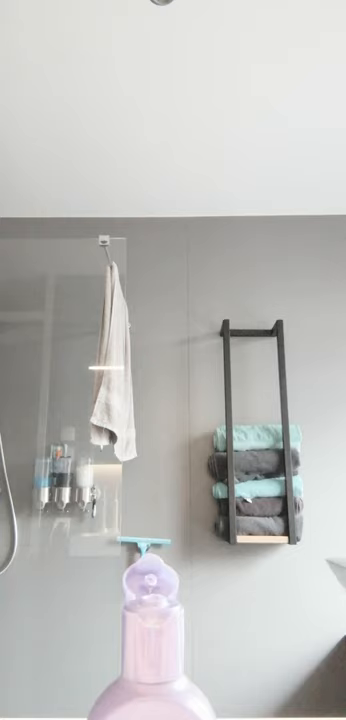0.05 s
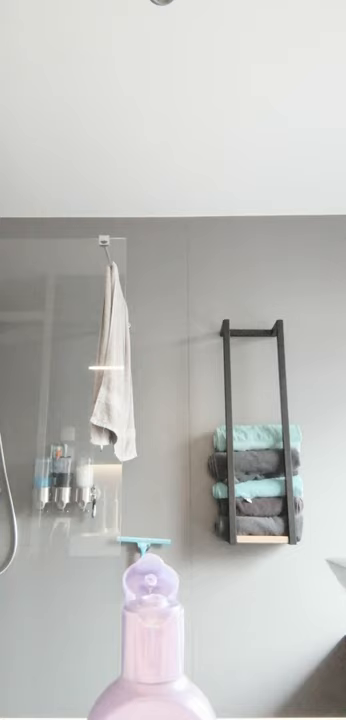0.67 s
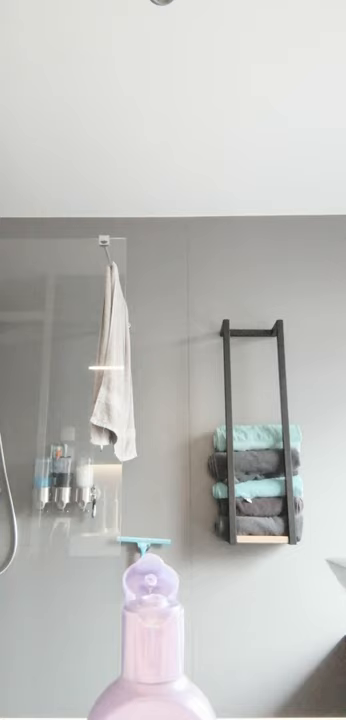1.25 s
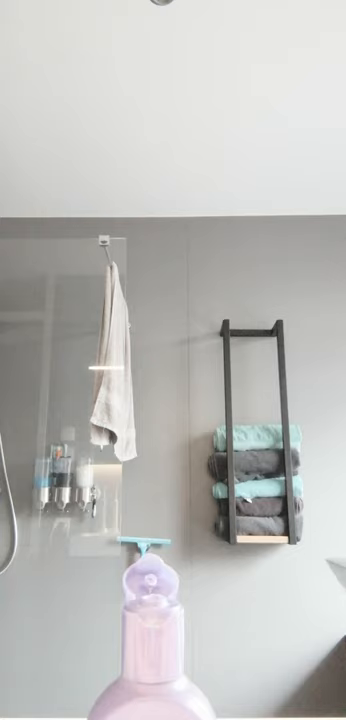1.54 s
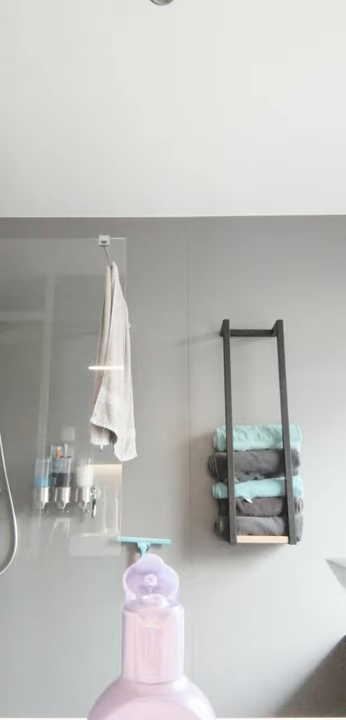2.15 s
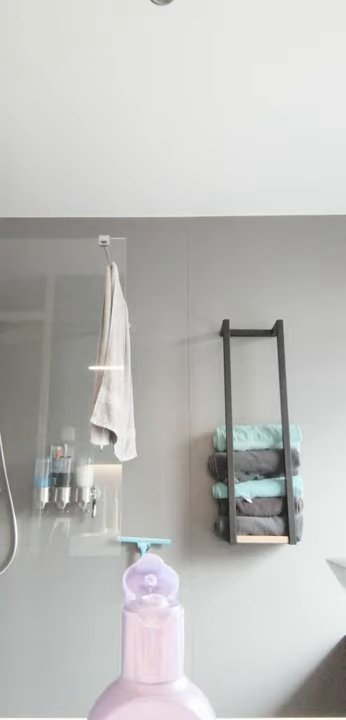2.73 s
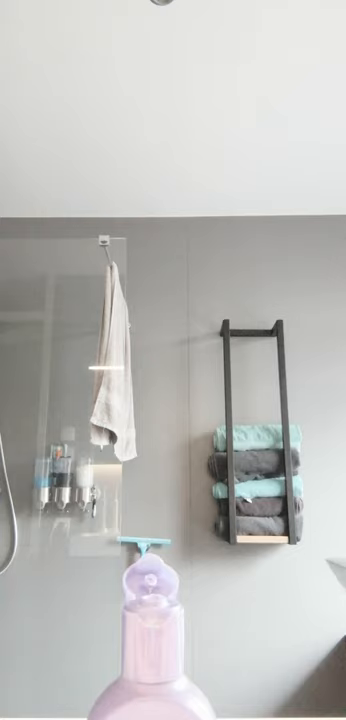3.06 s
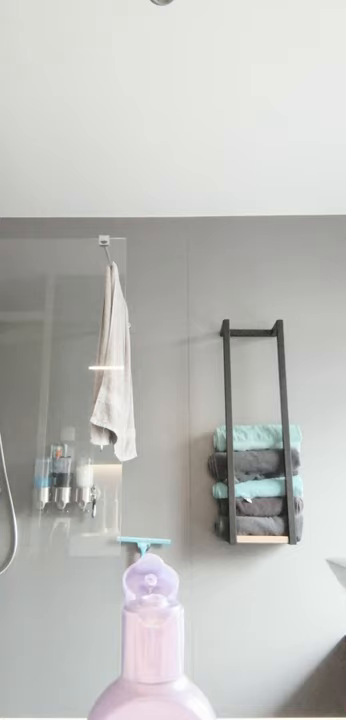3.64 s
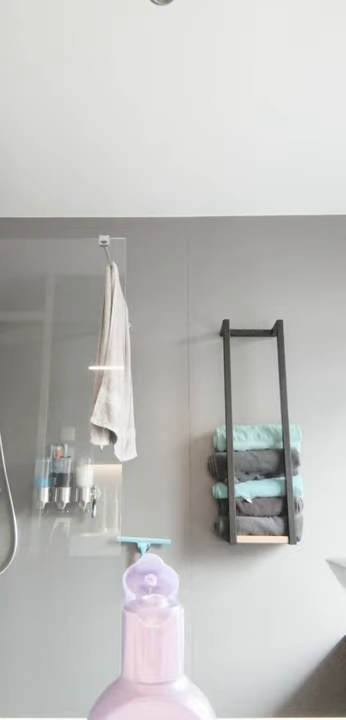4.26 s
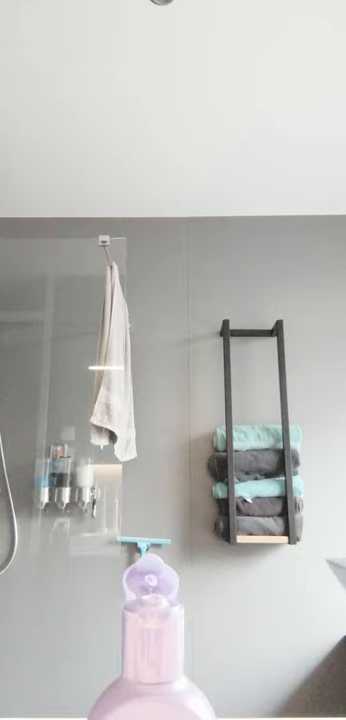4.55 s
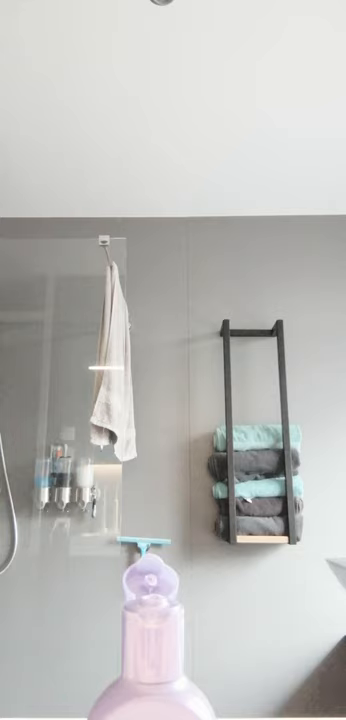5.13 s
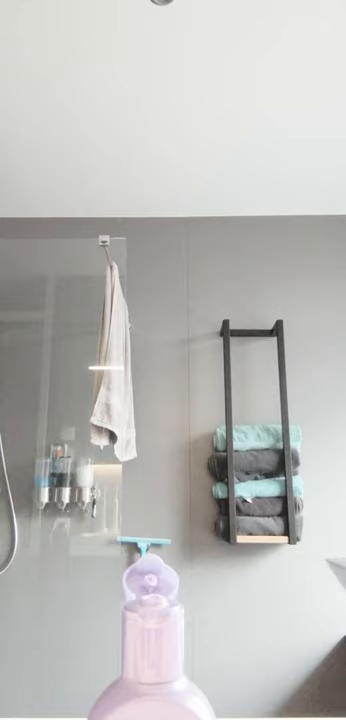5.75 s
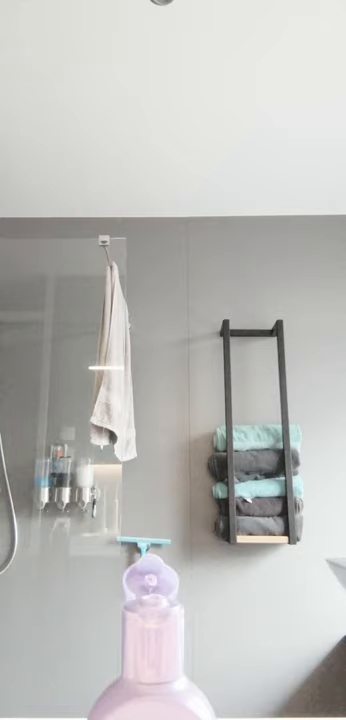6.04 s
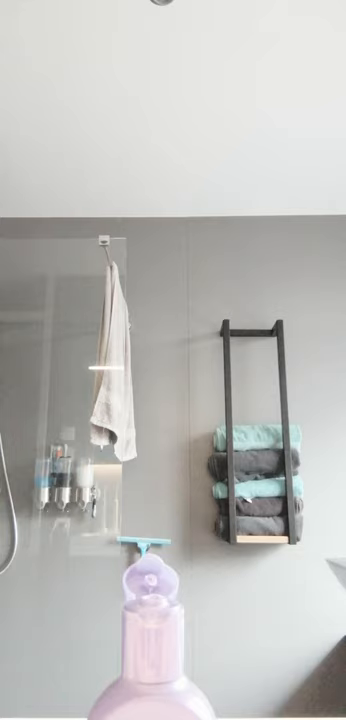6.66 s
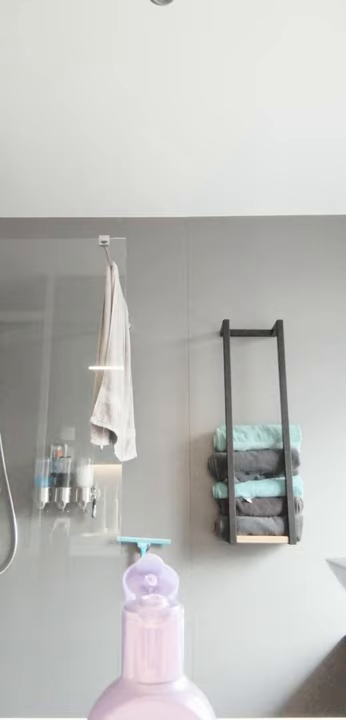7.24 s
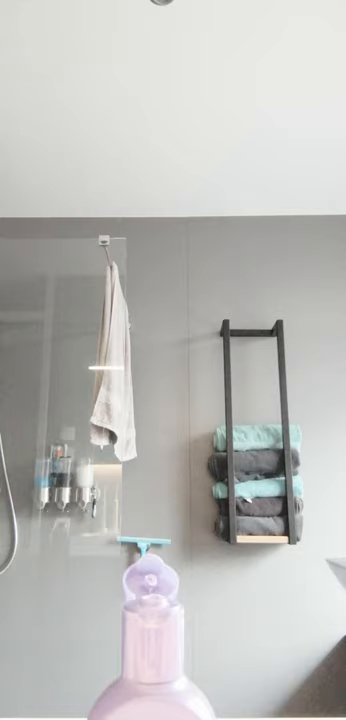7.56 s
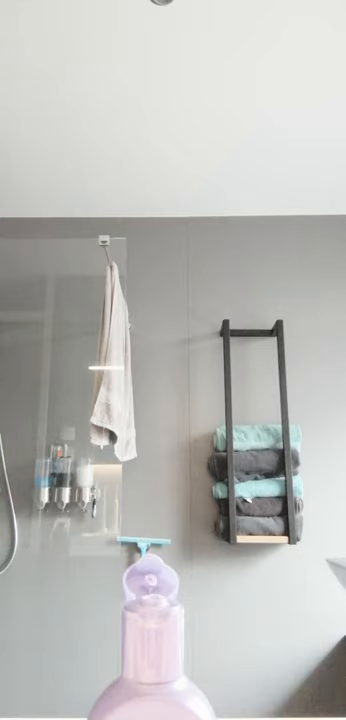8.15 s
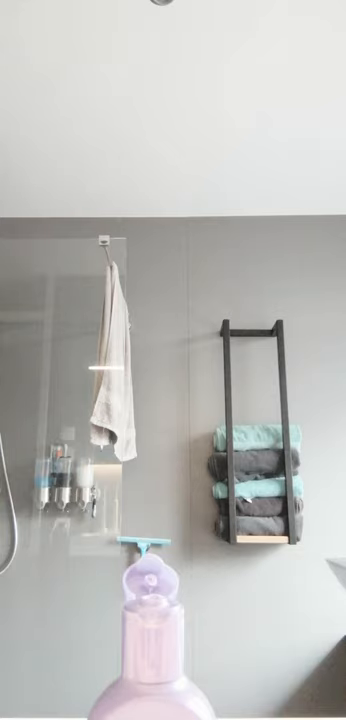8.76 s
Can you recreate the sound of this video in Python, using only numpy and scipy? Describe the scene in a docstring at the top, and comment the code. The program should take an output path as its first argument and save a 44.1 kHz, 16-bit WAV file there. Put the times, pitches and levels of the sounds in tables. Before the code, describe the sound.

Water sprays into a filling bathtub, hissing and gurgling, dropping to a dribble and surging back in an echoing bathroom.

```python
"""A tiled bathroom: water sprays into a filling tub; the jet swells, drops to a dribble and comes back.
Drop impacts on the pool add up to patter and hiss, and the jet drives the tub's shell into drumming.
Air forced under the surface resonates as bubbles: clouds of them gurgle, small clusters plink.
Single drops tick on the wall, two hard splashes stand out, and the tiles reverberate."""
import sys
import numpy as np
from scipy import signal
from scipy.fft import rfft, irfft, next_fast_len
from scipy.io import wavfile

SR = 44100
rng = np.random.default_rng(int(sys.argv[2]) if len(sys.argv) > 2 else 0)


def persist_wave(psi):
    """Save psi, clipped to +-1, as 16-bit WAV."""
    counts = np.round(np.clip(psi, -1, 1) * 32767).astype(np.int16)
    wavfile.write(sys.argv[1], SR, np.atleast_2d(counts).T)


N = 388080

# how hard the jet hits the pool: time_s, flow_db
JET_FLOW = [(0, -40.5), (.15, -37), (.44, -35.5), (.6, -41), (.76, -51), (1.25, -58.5), (1.49, -43),
            (1.67, -31.5), (2.05, -49), (2.3, -50), (2.42, -36), (3.3, -31.5), (4.05, -35), (5.2, -34),
            (5.38, -47), (5.62, -59), (6.08, -55.5), (6.3, -65), (6.72, -59.5), (6.96, -52), (7.2, -32),
            (8.05, -38.5), (8.8, -42)]
FULL_FLOW_DB = -34
# the spray's hiss and patter as heard, including the microphone's colour: frequency_hz, gain_db
HEARD_SPECTRUM = [(1300, -10), (2000, -8), (3200, -7.5), (3700, -13.5), (4200, -13), (5300, 1), (5900, 0.5),
                  (6600, -3.5), (7250, 0), (8700, -11), (11500, -12.5), (13800, -11.5), (14900, -5.5),
                  (15700, -31)]


def amp(db):
    """Decibels to amplitude ratio."""
    return 10 ** (np.asarray(db) / 20)


def unit(x):
    """Scale to rms 1."""
    return x / np.sqrt(np.mean(x ** 2) + 1e-20)


def peaking(x, db):
    """Scale to a peak level."""
    return amp(db) * x / np.abs(x).max()


def along(points, hz):
    """Interpolate (frequency, value) points on a logarithmic axis."""
    f, v = np.transpose(points)
    return np.interp(np.log(hz + 1), np.log(f + 1), v)


def curve(points):
    """Interpolate (time, value) points at every sample."""
    return np.interp(np.arange(N) / SR, *np.transpose(points))


def filtered(x, response):
    """Linear filtering: the spectrum times a frequency response."""
    n = x.shape[-1]
    m = next_fast_len(n + SR // 4)
    return irfft(rfft(x, m) * response(np.fft.rfftfreq(m, 1 / SR)), m)[..., :n]


def band(hz, lo_hz, hi_hz, order=8):
    """Butterworth band-pass magnitude."""
    return 1 / np.sqrt((1 + (lo_hz / (hz + 1)) ** (2 * order)) * (1 + (hz / hi_hz) ** (2 * order)))


def resonances(modes, hz):
    """Modal superposition: damped resonators summed with alternating sign."""
    return sum((-1) ** k * amp(db) * 1j * hz * width / (centre ** 2 - hz ** 2 + 1j * hz * width)
               for k, (centre, width, db) in enumerate(modes))


def add(track, start_s, sound):
    """Superpose a sound on a track."""
    part = track[..., max(round(start_s * SR), 0):][..., :sound.shape[-1]]
    part += sound[..., :part.shape[-1]]


def swell(t, length_s, attack_s, fade_db_per_s):
    """Linear rise, hold until length_s, exponential decay."""
    return np.clip(t / attack_s, 0, 1) * amp(-fade_db_per_s * np.maximum(t - length_s, 0))


def flow_gain(level_db, growth):
    """Power law: a layer gains growth dB for each dB of flow."""
    return amp(level_db + growth * (curve(JET_FLOW) - FULL_FLOW_DB))


def bathroom(x, direct_db, spacing_m=0.17, left_lead_s=.0003):
    """Reverberation: the direct sound plus a diffuse field, partly coherent between left and right."""
    # decay of the tiled room: frequency_hz, t60_s
    decay_times = [(150, 0.77), (1000, 0.38), (3000, 0.67), (6000, 0.54), (14000, 0.15)]
    hz, t, tail = signal.stft(rng.standard_normal((2, SR // 2)), SR, nperseg=256)
    tail = tail * amp(-60 * t / along(decay_times, hz)[:, None])
    coherence = np.sinc(2 * hz * spacing_m / 343)
    angle = np.arccos(coherence)[:, None] / 2
    mid, side = np.cos(angle) * tail[0], np.sin(angle) * tail[1]
    response = signal.istft(np.array([mid + side, mid - side]), SR, nperseg=256)[1]
    response /= np.linalg.norm(response[0])
    response[[0, 1], [0, round(left_lead_s * SR)]] += amp(direct_db)
    return signal.fftconvolve(x[None], response, axes=1)


def wandering(x, direct_db, block=16000):
    """A room's response depends on source position: as the impact point wanders, each block gets its own."""
    out = np.zeros((2, len(x)))
    for start in range(0, len(x), block):
        add(out, start / SR, bathroom(x[start:start + block], direct_db))
    return out


def impacts(per_s, spread_db, direct_db):
    """Shot noise in the room: drops strike at random times, many small, a few large."""
    count = int(per_s * N / SR)
    size = amp(spread_db * np.minimum(rng.exponential(size=count), 5))
    pulses = np.bincount(rng.integers(0, N, count), size * rng.choice([-1, 1], count), N)
    return wandering(pulses, direct_db)


def stream(colour, per_s, spread_db, direct_db):
    """Source and filter: random impacts shaped by a frequency response."""
    return unit(filtered(impacts(per_s, spread_db, direct_db), colour))


def shower(colour, per_s, spread_db, direct_db, wash_db=0):
    """Countless tiny impacts merge into Gaussian noise beneath the distinct ones."""
    hits = unit(impacts(per_s, spread_db, direct_db))
    return unit(filtered(hits + amp(wash_db) * rng.standard_normal((2, N)), colour))


def heard_band(lo_hz, hi_hz, order=8):
    """Frequency response for one band of the spray's spectrum as heard."""
    return lambda hz: amp(along(HEARD_SPECTRUM, hz)) * band(hz, lo_hz, hi_hz, order)


def bubbles(starts, pitch_hz, size, cycles, rise, n=N):
    """Minnaert resonance: each bubble rings, decays and climbs in pitch as it nears the surface."""
    t = np.arange(SR // 32) / SR
    turns = pitch_hz[:, None] * t
    age = turns / cycles
    envelope = (np.exp(-age) - np.exp(-turns)) * (1 - t / t[-1])
    ring = size[:, None] * np.sin(2 * np.pi * turns * (1 + rise * age)) * envelope
    samples = starts[:, None] + np.arange(len(t))
    return np.bincount(samples.ravel(), ring.ravel(), n)[:n]


def fizz(colour, lo_hz, hi_hz, spread_db, cycles, per_s=300):
    """Resonance varies inversely with radius: small bubbles of mixed sizes fill a band."""
    count = int(per_s * N / SR)
    pitch_hz = lo_hz * (hi_hz / lo_hz) ** rng.random(count)
    size = amp(spread_db * np.minimum(rng.exponential(size=count), 4))
    cloud = bubbles(rng.integers(0, N, count), pitch_hz, size, cycles, rise=0.011)
    return unit(filtered(wandering(cloud, direct_db=-6.5), colour))


def spray(thinning=0.44):
    """Smaller drops radiate higher frequencies: big ones patter, small ones hiss, the finest are a mist."""
    # how finely the jet breaks up: time_s, extra_mist_db
    fineness = [(0, -0.5), (1.2, 1), (1.5, -11), (1.7, -1.5), (1.98, -2), (2.22, 3), (2.6, 0.7), (5.1, 1.5),
                (5.42, -7), (5.6, 3), (6.3, -3), (6.72, 0), (7, 8.5), (7.4, -1.5), (8.1, 3)]
    low, middle, high = heard_band(1160, 4240), heard_band(4230, 10060), heard_band(9240, 17000)
    patter = shower(low, per_s=1200, spread_db=4, direct_db=-1.5)
    patter = unit(patter + amp(-5) * fizz(low, lo_hz=1306, hi_hz=3913, spread_db=2.5, cycles=9.7))
    # a weak jet makes few of the biggest drops
    biggest = filtered(patter, lambda hz: band(hz, lo_hz=200, hi_hz=1460))
    shortfall_db = np.minimum(curve(JET_FLOW) - FULL_FLOW_DB, 0)
    patter -= biggest * (1 - amp(thinning * shortfall_db))
    hiss = shower(middle, per_s=2000, spread_db=4.5, direct_db=-0.5, wash_db=-0.5)
    hiss = unit(hiss + amp(-1) * fizz(middle, lo_hz=4274, hi_hz=8920, spread_db=3, cycles=17))
    mist = shower(high, per_s=3000, spread_db=8.5, direct_db=-13) * amp(curve(fineness))
    # stray drops keep falling as the jet fades, so a dribble crackles
    strays = stream(heard_band(4620, 10100), per_s=70, spread_db=3.5, direct_db=-2)
    return (flow_gain(-37, growth=0.94) * patter + flow_gain(-32, growth=1.02) * hiss
            + flow_gain(-41.5, growth=.96) * mist + flow_gain(-45, growth=.62) * strays)


def tub():
    """Forced vibration: the jet drums on the shell's modes and churns the shallows over a deep rumble."""
    # modes of the shell: frequency_hz, width_hz, gain_db
    shell_modes = [(100, 16, -3.5), (132.7, 16.4, 6), (155.3, 15.3, 6), (194.2, 16, 4.5), (236, 10.6, 5.5),
                   (308.2, 25.7, 2.5)]
    # spectrum of churned water: frequency_hz, gain_db
    churn_spectrum = [(150, -34), (300, -13), (380, -1.5), (550, 0.5), (680, -0.5), (850, -3), (1150, -9.5),
                      (1500, -17), (3000, -56)]
    # the jet sweeps over shell and shallows: start_s, length_s, drum_db, churn_db, rumble_db
    sweeps = [(0, 0.65, -56, -57.5, -62.5), (0.5, 0.097, -52, -71, -72), (1.41, 0.18, -78, -54, -74),
              (1.58, 0.15, -50, -37.5, -66), (1.75, 0.13, -55.5, -47.5, -49), (2.85, 0.35, -57.5, -59, -69),
              (3.323, 0.2, -48.5, -48, -65), (3.6, 1.35, -61.5, -62.5, -77), (4.72, 0.18, -65, -74, -66),
              (5.107, 0.13, -45, -42.5, -58), (5.33, 0.09, -44, -49.5, -62), (5.657, 0.14, -53, -64, -55.5),
              (6.104, .85, -66, -91, -71), (6.913, .15, -61, -57, -72), (7.122, 0.15, -54, -47.5, -72),
              (7.258, 0.25, -38, -38, -52), (7.457, 0.16, -38.5, -36, -54), (7.677, 0.29, -47.5, -41, -64),
              (7.997, 0.34, -49, -52.5, -63), (8.276, 0.19, -42, -48.5, -59),
              (8.56, .24, -42.5, -52.5, -58.5)]
    drum = stream(lambda hz: resonances(shell_modes, hz) * band(hz, lo_hz=82, hi_hz=400, order=4),
                  per_s=600, spread_db=2, direct_db=-1.5)
    churn = stream(lambda hz: amp(along(churn_spectrum, hz)), per_s=500, spread_db=3.5, direct_db=-1)
    rumble = unit(filtered(rng.standard_normal(N), lambda hz: band(hz, lo_hz=46.5, hi_hz=74, order=4)))
    # a faint bed follows the flow; the sweeps add to it in power
    power = np.array([flow_gain(-66, 0.089), flow_gain(-65.5, 0.19), flow_gain(-70.5, .17)]) ** 2
    for start_s, length_s, *levels_db in sweeps:
        t = np.arange(int((length_s + 1) * SR)) / SR
        envelope = swell(t, length_s, attack_s=0.044, fade_db_per_s=65.5)
        add(power, start_s, np.outer(amp(levels_db), envelope) ** 2)
    return sum(gain * layer for gain, layer in zip(np.sqrt(power), (drum, churn, rumble)))


def bubble_cloud(pitch_hz, flow_db, n, per_s=500, stray_share=.18):
    """Large bubbles resonate near one pitch; a stronger jet tears them into a wider range of sizes."""
    count = int(per_s * n / SR)
    stray = rng.random(count) < stray_share
    scatter = np.interp(flow_db, [-52, -36], [0.038, 0.074]) + 0.216 * stray
    own_hz = pitch_hz * np.exp(scatter * rng.standard_normal(count))
    size = amp(1.5 * rng.standard_normal(count) - 1.6 * stray)
    cloud = bubbles(rng.integers(0, n, count), own_hz, size, cycles=12, rise=0.0044, n=n)
    cloud = filtered(cloud, lambda hz: band(hz, .7 * pitch_hz, 1.45 * pitch_hz, order=6))
    return unit(wandering(cloud, direct_db=-1.5))


def gurgle(burble_hz=992):
    """Air entrainment: each gulp swells into a bubble cloud and dies away, over a quiet burble."""
    # air driven under the surface: start_s, length_s, level_db, pitch_hz
    gulps = [(0.252, 0.15, -48, 1330), (1.371, .07, -45, 1043), (1.424, .08, -44, 730),
             (1.521, 0.054, -40, 1060), (2.256, 0.096, -44.5, 1124), (2.47, .06, -35.5, 853),
             (2.688, 0.052, -46, 1080), (2.801, .11, -46.5, 852), (2.953, 0.27, -40.5, 1080),
             (3.228, .15, -39, 935), (3.3, 1.55, -40.5, 984), (4.759, 0.17, -41, 930),
             (4.952, .2, -45, 975), (5.73, 0.13, -51, 1046), (5.845, 0.086, -44, 827),
             (6.028, .26, -49.5, 1276), (6.41, .1, -46, 925), (6.763, 0.069, -55.5, 1120),
             (7.2, 0.37, -44.5, 944), (7.721, 0.11, -38, 843), (7.901, 0.8, -55, 867)]
    out = flow_gain(-60, growth=0.2) * bubble_cloud(burble_hz, FULL_FLOW_DB, N, per_s=200)
    for start_s, length_s, level_db, pitch_hz in gulps:
        t = np.arange(int((length_s + .5) * SR)) / SR
        flow_db = np.interp(start_s, *np.transpose(JET_FLOW))
        envelope = swell(t, length_s, attack_s=.03, fade_db_per_s=93)
        add(out, start_s, amp(level_db) * envelope * bubble_cloud(pitch_hz, flow_db, len(t)))
    return out


def plinks(straggle_s=.0028, count=12):
    """Bubble resonance: a falling blob traps one main bubble, then a string of weaker ones."""
    # blobs falling into the pool: start_s, level_db, pitch_hz, scatter_ratio
    blobs = [(1.122, -43, 7300, .03), (1.378, -38, 9300, 0.092), (1.432, -27, 2240, .14),
             (1.594, -23, 6930, .08), (1.956, -31.5, 2360, .1), (2.02, -35.5, 1630, .04),
             (2.279, -33, 1550, 0.15), (2.425, -28, 1730, 0.13), (2.468, -25, 3090, 0.068),
             (2.53, -24.5, 1810, 0.21), (2.894, -23, 2620, .3), (3.595, -17.5, 5040, 0.11),
             (3.683, -19.5, 2400, 0.32), (5.68, -32.5, 2840, 0.033), (5.689, -34.5, 1803, 0.22),
             (5.861, -36.5, 5180, 0.038), (5.87, -36, 2090, 0.034), (5.914, -38, 2120, 0.1),
             (5.985, -36, 5100, 0.098), (6.028, -32, 2840, .03), (6.043, -32, 5450, 0.098),
             (6.075, -35, 7070, 0.22), (6.463, -46, 3080, 0.034), (6.647, -42, 6200, .055),
             (6.68, -33, 6300, 0.037), (6.714, -29.5, 8160, 0.045), (6.73, -42.5, 1900, .1),
             (6.846, -29, 5280, 0.11), (7.127, -22.5, 4840, 0.15), (7.15, -33.5, 295, 0.06),
             (7.285, -22.5, 2930, 0.35), (7.47, -26, 2590, .3), (7.54, -24.5, 2115, 0.29)]
    out = np.zeros((2, N))
    order = np.arange(count)
    for start_s, level_db, pitch_hz, scatter in blobs:
        starts = (SR * straggle_s * order * rng.random(count)).astype(int)
        own_hz = pitch_hz * np.exp(scatter * (order > 0) * rng.standard_normal(count))
        cluster = bubbles(starts, own_hz, size=1 / (1 + order / 4), cycles=18, rise=0.0014, n=SR // 8)
        add(out, start_s, peaking(bathroom(cluster, direct_db=0), level_db - 0.5))
    return out


def burst(t60_s, attack_s):
    """A lump of water breaks up in a broadband transient that decays exponentially."""
    t = np.arange(SR // 6) / SR
    return rng.standard_normal(len(t)) * (1 - np.exp(-t / attack_s)) * amp(-60 * t / t60_s)


def drops():
    """A brief impact has a wide spectrum: single drops tick on the tub's hard wall."""
    # drops on the wall: start_s, level_db
    wall_hits = [(1.245, -37), (1.516, -31), (1.948, -22.5), (2.2208, -27), (5.161, -19), (5.5476, -37.5),
                 (5.9174, -34), (6.0636, -36), (6.2462, -38), (6.2776, -42.5), (6.4413, -37), (6.472, -35),
                 (6.5196, -40), (6.9631, -28.5), (7.0793, -21), (7.1882, -19), (7.205, -19),
                 (7.5094, -20.5)]
    out = np.zeros((2, N))
    for start_s, level_db in wall_hits:
        tick = bathroom(burst(t60_s=0.03, attack_s=0.00079), direct_db=0.5)
        tick = filtered(tick, heard_band(3400, 11500, order=3))
        add(out, start_s, peaking(tick, level_db + .5))
    return out


def splashes():
    """Transient excitation of resonances: a hard splash rings brightly over a dull slap."""
    # hard splashes: start_s, level_db, slap_db, t60_s, pitch_ratio
    hard_hits = [(1.290, -21.3, -27, 0.058, 0.98), (7.719, -15.5, -1, 0.073, 0.94)]
    # resonances of a splash: frequency_hz, width_hz, gain_db
    modes = [(2790, 60, 2.5), (3450, 150, 0), (4270, 400, -9), (4760, 200, -3), (5150, 300, 0),
             (5840, 380, -1)]
    out = np.zeros((2, N))
    for start_s, level_db, slap_db, t60_s, pitch_ratio in hard_hits:
        ring = filtered(burst(t60_s, attack_s=0.0052),
                        lambda hz: resonances(modes, hz / pitch_ratio) * band(hz, 2320, 6960))
        slap = filtered(burst(t60_s, attack_s=0.00071), lambda hz: band(hz, 590, 4000, order=3))
        splash = bathroom(unit(ring) + amp(slap_db) * unit(slap), direct_db=-4.5)
        add(out, start_s, peaking(splash, level_db + 2))
    return out


def scene():
    """All the water superposed; a level difference places it on the side where the jet lands."""
    # where the jet lands: time_s, left_minus_right_db
    aim = [(0, 2), (.8, 2), (1.3, -0.5), (2.2, 1.24), (7.4, 1.2), (8.1, -2.5), (8.8, -4)]
    pan = amp(np.outer([1, -1], curve(aim)) / 2)
    return (spray() + gurgle() + tub() + drops() + plinks() + splashes()) * pan


def record(dry, top_hz=15850):
    """Left and right differ in frequency response and share one band limit."""
    # colour difference between the sides: frequency_hz, left_minus_right_db
    balance = [(60, -4), (500, -4), (1200, -5), (2700, -5.5), (4200, -10.5), (6400, -7), (8300, 9),
               (9800, -1), (12000, -4), (15000, -10.5)]
    return filtered(dry, lambda hz: amp(np.outer([1, -1], along(balance, hz)) / 2) * (hz < top_hz))


dry = scene()
out = record(dry)
persist_wave(out)
```